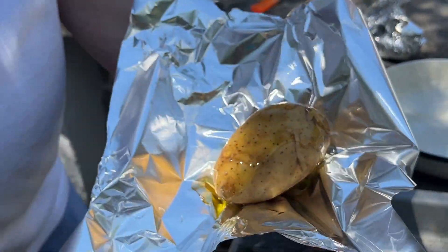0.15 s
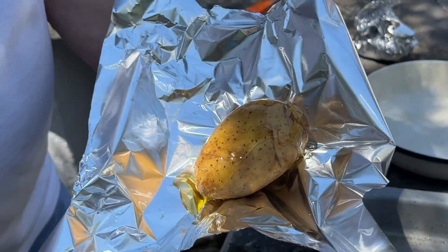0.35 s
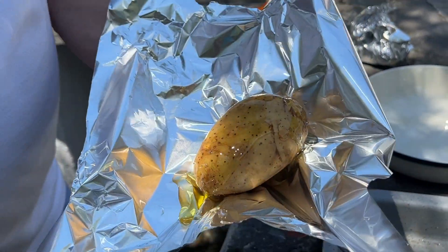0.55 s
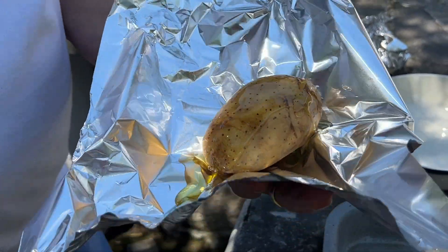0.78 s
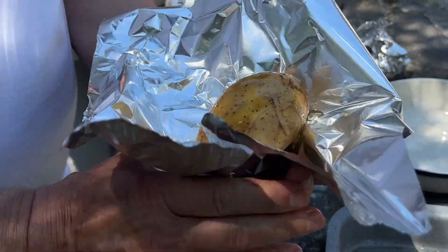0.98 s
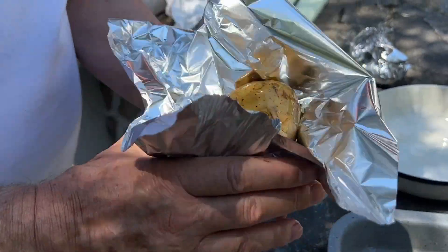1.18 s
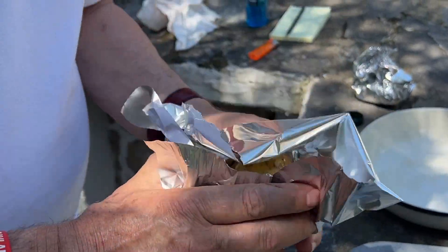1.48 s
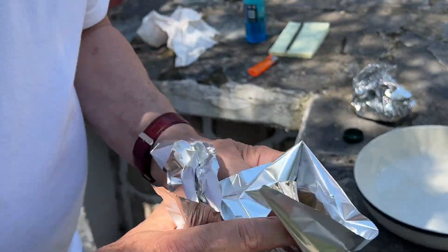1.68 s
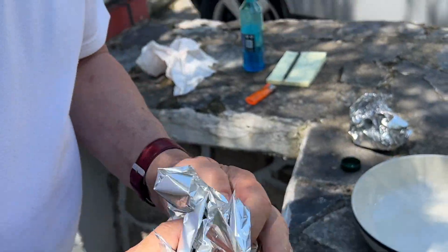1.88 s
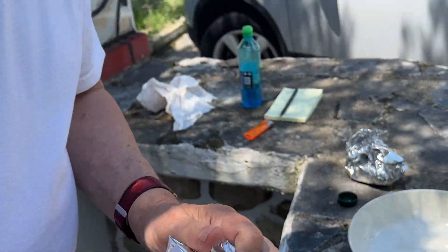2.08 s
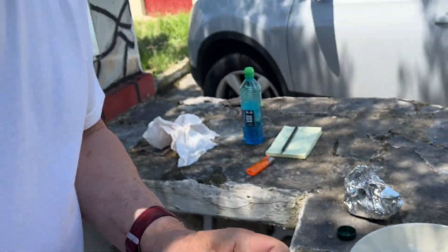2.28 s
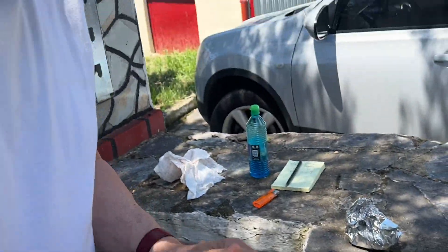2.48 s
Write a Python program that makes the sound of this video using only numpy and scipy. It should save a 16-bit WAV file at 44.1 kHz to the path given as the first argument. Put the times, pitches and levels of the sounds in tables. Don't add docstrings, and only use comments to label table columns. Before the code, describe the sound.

Foil is wrapped by hand around a potato, with sharp metallic crackles after a quiet start of small snaps, low sheet wobbles and a bottle bouncing on a table; close stereo phone pickup, light wind and hiss.

```python
import sys
import numpy as np
from scipy import signal
from scipy.fft import rfft, irfft, next_fast_len
from scipy.io import wavfile
from scipy.ndimage import map_coordinates

SR = 44100
rng = np.random.default_rng(int(sys.argv[2]) if len(sys.argv) > 2 else 0)


def voltage_ratio(decibels):
    exponent = np.asarray(decibels, float) / 20
    return 10 ** exponent


def dump(signal):
    limited = np.clip(np.atleast_2d(signal).T, -1, 1)
    pcm = np.round(limited * 32767).astype(np.int16)
    wavfile.write(sys.argv[1], SR, pcm)


N = 116865

# t/s, body level/dB, shell level/dB, ring level/dB, crack level/dB
BOTTLE_KNOCKS = [
    (-0.008, -35, -43, -25, -40),
    (0.2325, -15, -28, -29, -27),
    (0.2645, -19, -36, -31, -28),
]
BODY_STIFLED = [
    .018,
    .263,
    9,
]
# f/Hz, level/dB, rise/s, t60/s
BOTTLE_BODY = [(205, 26, .05, .09), (232.5, 15, .05, .09), (200, -4, .03, .22), (290, 0, .006, .04),
               (161.7, 11, .05, .07)]
# f/Hz, level/dB, rise/s, t60/s
BOTTLE_SHELL = [(600, 23, .008, .028), (545, 16, .008, .03)]
# f/Hz, level/dB, rise/s, t60/s
BOTTLE_RING = [(1008, -9, .003, .105), (1560, -10, .001, .04), (830, -10, .004, .04)]
# t/s, level/dB
WIND_GUSTS = [(0.0, -53), (0.11, -45), (0.78, -43.5), (0.81, -33), (0.91, -44.5), (0.94, -39.5),
              (1.15, -37.5), (1.17, -63), (1.26, -42), (1.41, -55), (1.44, -43.5), (1.7, -53.5),
              (1.91, -48.5), (1.95, -45), (2.07, -48), (2.12, -46.5), (2.4, -43), (2.65, -57.5)]
# f/Hz, level/dB
WIND_SPECTRUM = [(20, -67), (40, 9), (58, 19.5), (110, 12), (200, -2.5), (500, -22), (1000, -27.5)]
# f/Hz, level/dB
HISS_SPECTRUM = [(300, -39), (1500, -2), (9000, -22), (10600, 5), (12000, 16), (15000, 21.5)]
# t/s, level/dB
LOOSE_RUSTLE = [
    (0.0, -52.5),
    (0.094, -63),
    (0.196, -83),
    (0.552, -69),
    (0.732, -121),
    (0.794, -42.5),
    (0.92, -73),
]
# t/s, level/dB, brightness/dB
CRUMPLING = [(0.92, -31, 0), (0.968, -30.5, -4), (0.996, -26, -6), (1.082, -36.5, -14), (1.112, -34, -6.5),
             (1.324, -29, -7), (1.352, -36.5, -6), (1.478, -35, -10), (1.56, -31.5, -9),
             (1.638, -28.5, -6.5), (1.912, -30, -22), (1.97, -34.5, -32), (1.998, -33, -12),
             (2.192, -37, -25.5), (2.39, -37.5, -24), (2.572, -40, -28.5), (2.584, -47.5, -34),
             (2.65, -47.5, -5)]
# t/s, peak level/dB, centre f/Hz
LOOSE_SNAPS = [(0.0204, -31, 3600), (0.1153, -41.5, 4350), (0.392, -36, 2780), (0.4269, -37.5, 1130),
               (0.453, -25, 8340), (0.456, -35, 840), (0.485, -40.5, 1010), (0.515, -43.5, 700),
               (0.621, -36, 4500), (0.626, -39, 490), (0.7226, -35.5, 6200), (0.7614, -24, 4050),
               (0.7947, -21.5, 4000), (0.833, -38.5, 5870), (0.8753, -27.5, 8100), (0.8835, -26, 3300),
               (0.9198, -25, 7900)]
# t/s, peak level/dB, centre f/Hz
FOIL_CRACKS = [(0.9191, -21, 8000), (0.9311, -19, 7600), (0.9823, -33, 7630), (0.9839, -12, 7250),
               (0.995, -16, 7150), (1.0992, -20, 3070), (1.1138, -19, 8300), (1.1334, -14.5, 8400),
               (1.1926, -20, 8700), (1.2, -18, 3160), (1.217, -19, 4130), (1.234, -27, 8750),
               (1.2576, -12, 8300), (1.277, -10, 5610), (1.307, -11, 8500), (1.3757, -24.5, 2870),
               (1.4075, -19.5, 5500), (1.436, -25, 6680), (1.4607, -25, 2560), (1.4941, -17, 8400),
               (1.5141, -20, 1100), (1.543, -25, 6230), (1.5598, -26, 3150), (1.5706, -13, 2880),
               (1.5858, -18, 2800), (1.6224, -16, 8810), (1.6751, -13, 8400), (1.6984, -16, 2040),
               (1.711, -19, 3280), (1.77, -18.5, 1220), (1.812, -16, 1840), (1.826, -16.5, 3400),
               (1.859, -19, 2710), (2.0021, -16.5, 6490), (2.0229, -18.5, 3600), (2.064, -19.5, 2700),
               (2.1082, -22, 7600), (2.1085, -16.5, 8100), (2.1269, -23, 3030), (2.1843, -33, 2620),
               (2.2044, -40, 3360), (2.2224, -30, 5610), (2.2398, -29, 5050), (2.2753, -18.5, 7940),
               (2.2933, -18, 8110), (2.3474, -30, 3230), (2.3591, -19.5, 8240), (2.3672, -21.5, 3850),
               (2.3785, -17, 3100), (2.4179, -27, 8100), (2.4613, -27.5, 3440), (2.5157, -30, 3110),
               (2.5282, -27, 6000), (2.5576, -19.5, 1350), (2.6028, -27, 8000), (2.6038, -24, 3000),
               (2.624, -22, 5150),
               (1.267, -16.5, 5920), (1.2864, -15, 8810), (1.3164, -13, 3760), (1.33, -15, 8000),
              (1.353, -31, 7970), (1.404, -22, 2860), (1.4098, -26, 3500), (1.6064, -20, 5800),
              (1.716, -21.5, 3300), (1.7791, -18.5, 2460), (1.9063, -18.5, 3430), (2.0437, -25, 1270),
              (2.258, -23, 5240), (2.3144, -24, 8240), (2.3894, -27, 3590), (2.5723, -28, 4450),
              (2.6434, -27, 5900)]
# f/Hz, level/dB
FOIL_SPECTRUM = [(250, 7.5), (700, 5), (1150, 2), (3000, 2), (7500, 1.5), (8300, 1.5), (11300, 5),
                 (13500, 1)]
# t/s, level/dB
PANEL_SWING = [(0.38, -55), (0.53, -27), (0.7, -76), (0.76, -39), (0.78, -59), (0.85, -55), (0.9, -76),
               (0.93, -31.5), (1.26, -57), (1.75, -74), (2.09, -49), (2.36, -50.5), (2.65, -64)]
# t/s, peak level/dB, pitch f/Hz
PANEL_FLAPS = [(0.434, -35, 224), (0.488, -34, 116), (0.51, -27, 175), (0.529, -29.5, 192),
               (0.548, -35.5, 203.5), (0.578, -33.5, 167), (0.623, -31.5, 166), (0.643, -31.5, 126),
               (0.717, -36, 131), (0.745, -26, 145), (0.789, -39, 294), (0.8, -29, 78.5),
               (0.823, -36.5, 225), (0.844, -34, 192), (0.868, -42.5, 151), (0.928, -29, 218.4),
               (0.975, -41, 192), (0.991, -37, 359), (1.02, -37, 193), (1.063, -30, 175), (1.115, -48, 82),
               (1.191, -37.5, 137), (1.273, -38, 112), (1.441, -42, 98), (2.34, -38, 152)]
# f/Hz, whole turns
PORT_TURNS = [(8650, 0), (9850, .49), (10450, .51), (11800, .99), (12350, 1.01), (13450, 1.49),
              (14200, 1.51), (15300, 2)]
# f/Hz, level/dB
PORT_LEAK = [(600, -16), (1000, -21), (2000, -26), (3400, -13), (4100, -37)]


def unit(x):
    return x / np.sqrt(np.mean(x ** 2) + 1e-20)


def along(points, hz):
    f, v = np.transpose(points)
    return np.interp(np.log(hz + 1), np.log(f + 1), v)


def curves(rows):
    s, *cols = np.transpose(rows)
    return [np.interp(np.arange(N) / SR, s, c) for c in cols]


def wobble(rate):
    return map_coordinates(rng.standard_normal(int(N * rate / SR) + 4), [np.arange(N) * rate / SR])


def filtered(x, response):
    m = next_fast_len(N + 8192)
    return irfft(rfft(x, m) * response(np.fft.rfftfreq(m, 1 / SR)), m)[..., :N]


def below(hz, corner, order):
    return 1 / (1 + (hz / corner) ** order)


def above(hz, corner, order):
    return 1 / (1 + (corner / (hz + 1)) ** order)


def dying(x, t60):
    return signal.lfilter([1], [1, -voltage_ratio(-60 / (t60 * SR))], x)


def hump(centre_hz, depth_db, octaves):
    return lambda hz: voltage_ratio(depth_db * (np.exp(-(np.log2((hz + 1) / centre_hz) / octaves) ** 2) - 1))


def ringing(hz, rise, t60, t, start=0):
    return np.sin(2 * np.pi * hz * (t + start)) * (1 - np.exp(-t / rise)) ** 2 * voltage_ratio(-60 * t / t60)


def modes(table, t):
    return sum(voltage_ratio(db) * ringing(hz, rise, t60, t) for hz, db, rise, t60 in table)


def scattered(x, t60):
    size, out, t = 4096, np.zeros(N + SR), np.arange(SR // 8) / SR
    padded = np.pad(x, (size, 2 * size))
    fade = signal.get_window("hann", 2 * size)
    for start in range(0, N + size, size):
        answer = rng.standard_normal(len(t)) * voltage_ratio(-60 * t / t60)
        piece = signal.fftconvolve(padded[start:start + 2 * size] * fade, answer / np.linalg.norm(answer))
        out[start:start + len(piece)] += piece
    return out[size:size + N] * np.sqrt(4 / 3)


def bottle():
    lead = SR // 10
    out, t = np.zeros(N + SR), np.arange(SR // 3) / SR
    body_t = np.maximum(t - 0.003, 0)
    for (s, body_db, shell_db, ring_db, crack_db), stifled in zip(BOTTLE_KNOCKS, BODY_STIFLED):
        body = sum(voltage_ratio(db) * ringing(hz, rise, t60, body_t, s) for hz, db, rise, t60 in BOTTLE_BODY)
        body = body * np.exp(-np.maximum(t + s - stifled, 0) / 0.018)
        crack = signal.lfilter([.3], [1, -.7], rng.standard_normal(len(t)))
        crack = crack * voltage_ratio(-5 - 60 * t / 0.055)
        knock = voltage_ratio(body_db + 7) * body + voltage_ratio(crack_db) * crack
        knock = knock + voltage_ratio(shell_db) * modes(BOTTLE_SHELL, t) + voltage_ratio(ring_db) * modes(BOTTLE_RING, t)
        out[round(s * SR) + lead:][:len(t)] += knock
    out = out[lead:][:N]
    table = scattered(filtered(out, lambda hz: above(hz, 380, 6)), t60=0.18)
    return out + voltage_ratio(-11) * table


def outdoors():
    wind_db, = curves(WIND_GUSTS)
    gusts = filtered(rng.standard_normal((2, N)), lambda hz: voltage_ratio(along(WIND_SPECTRUM, hz)))
    ports = gusts[0] + voltage_ratio(-18) * gusts[1] * [[1], [-1]]
    rumble = unit(voltage_ratio(2.5 * wobble(23)) * ports)
    hiss = unit(filtered(rng.standard_normal(N), lambda hz: voltage_ratio(along(HISS_SPECTRUM, hz))))
    return voltage_ratio(wind_db) * rumble + voltage_ratio(-46 + 0.71 * wobble(4.3)) * hiss


def crackle():
    grains_per_s, grain_t60 = 4000, 0.0065
    out, clump = np.zeros(N), wobble(45)
    for centre_hz in (1100, 1800, 3000, 5000, 8200, 12500):
        starts = rng.random(N) < grains_per_s / 6 / SR
        size = np.minimum(rng.exponential(1, N), 2.6)
        clump_db = 1.6 * (.7 * clump + .7 * wobble(40))
        sizes = starts * voltage_ratio(5 * size + clump_db)
        grains = unit(dying(sizes, grain_t60) * rng.standard_normal(N))
        out += filtered(grains, hump(centre_hz, depth_db=18, octaves=.5))
    return unit(out)


def buckles(rows, t60, tail_db, colour_db):
    tail_t60, rise = 0.071, 0.001
    out, t = np.zeros(N + SR), np.arange(SR // 5) / SR
    hz = np.fft.rfftfreq(len(t), 1 / SR)
    for s, db, centre_hz in rows:
        depth_db = colour_db + 9 * (centre_hz < 1500)
        colour = hump(centre_hz, depth_db, octaves=.65)(hz)
        noise = unit(irfft(rfft(rng.standard_normal(len(t))) * colour, len(t)))
        shape = voltage_ratio(-60 * t / t60) + voltage_ratio(tail_db - 60 * t / tail_t60)
        out[round(s * SR):][:len(t)] += voltage_ratio(db) * noise * shape * (1 - np.exp(-t / rise))
    return out[:N]


def foil():
    strength_db, bright_db = curves(CRUMPLING)
    loose_db, = curves(LOOSE_RUSTLE)
    since = np.arange(N) / SR - CRUMPLING[0][0]
    grains = unit(crackle() + voltage_ratio(-8) * rng.standard_normal(N))
    struck = grains * voltage_ratio(np.where(since >= 0, strength_db, loose_db))
    cracks = buckles(sorted(FOIL_CRACKS), t60=0.014, tail_db=-10.5, colour_db=15)
    snaps = buckles(LOOSE_SNAPS, t60=0.019, tail_db=-8.5, colour_db=11)
    struck = struck + voltage_ratio(-8) * cracks + voltage_ratio(-9) * snaps
    sheet = struck + voltage_ratio(-7) * scattered(struck, t60=0.22)
    sheet = filtered(sheet, lambda hz: voltage_ratio(along(FOIL_SPECTRUM, hz)))
    top = filtered(sheet, lambda hz: above(hz, 8500, 6))
    low = filtered(sheet, lambda hz: below(hz, 850, 6))
    top_gain = voltage_ratio(0.31 * (bright_db - bright_db.mean()))
    low_gain = voltage_ratio(-5 * np.maximum(since, 0))
    return sheet + top * (top_gain - 1) + low * (low_gain - 1)


def flaps():
    rise, t60 = 0.014, 0.036
    out, t = np.zeros(N + SR), np.arange(SR // 5) / SR
    for s, db, hz in PANEL_FLAPS:
        second_hz = hz * (1.343 + 0.32 * rng.random())
        pop = ringing(hz, rise, t60, t) + 0.15 * ringing(second_hz, rise / 2, t60, t)
        puff = unit(signal.lfilter(*signal.butter(4, 300, fs=SR), rng.standard_normal(len(t))))
        puff = puff * t / rise * np.exp(1 - t / rise)
        pop = pop / np.abs(pop).max() + voltage_ratio(-20) * puff
        out[round((s - .004) * SR):][:len(t)] += voltage_ratio(db + 3) * pop / np.abs(pop).max()
    swing_db, = curves(PANEL_SWING)
    flex = unit(filtered(rng.standard_normal(N), lambda hz: below(hz, 250, 5) * above(hz, 110, 4)))
    fade_in = np.clip((np.arange(N) / SR - PANEL_SWING[0][0]) / 0.18 + 1, 0, 1)
    return out[:N] + flex * voltage_ratio(swing_db - 7.5 + wobble(26.0)) * fade_in


def scene():
    return bottle() + outdoors() + foil() + flaps()


def band_limit(x):
    return signal.sosfilt(signal.butter(12, 17110, fs=SR, output="sos"), x)


def record(dry):
    x, apart = dry.mean(axis=0), (dry[0] - dry[1]) / 2
    smeared = scattered(x, t60=0.0061)
    share = .45
    drift = 0.071 * wobble(28.8)

    def half(hz):
        return np.pi * along(PORT_TURNS, hz)

    def turned(hz):
        return (hz > PORT_TURNS[0][0]) * (hz < PORT_TURNS[-1][0])

    def leak(hz):
        return voltage_ratio(along(PORT_LEAK, hz)) * (hz < 8000) * above(hz, 300, 4)

    def bass_lean(hz):
        return 0.1 * (1 + 1.5j) * below(hz, 450, 4) * above(hz, 130, 4)

    mid = filtered(x, lambda hz: np.cos(half(hz))) - drift * filtered(x, lambda hz: np.sin(half(hz)))
    side = filtered(x, lambda hz: 1j * np.sin(half(hz)))
    side = side + drift * filtered(x, lambda hz: 1j * turned(hz) * np.cos(half(hz)))
    side = side * np.sqrt(1 - share) + apart
    side = side + np.sqrt(share) * filtered(smeared, lambda hz: np.sin(half(hz)))
    side = side + voltage_ratio(6 * wobble(11.71)) * filtered(smeared, leak)
    side = side + filtered(x, bass_lean)
    pair = filtered(np.array([mid + side, mid - side]), lambda hz: below(hz, 15800, 160))
    return band_limit(pair)


dry = scene()
out = record(dry)
dump(out)
```